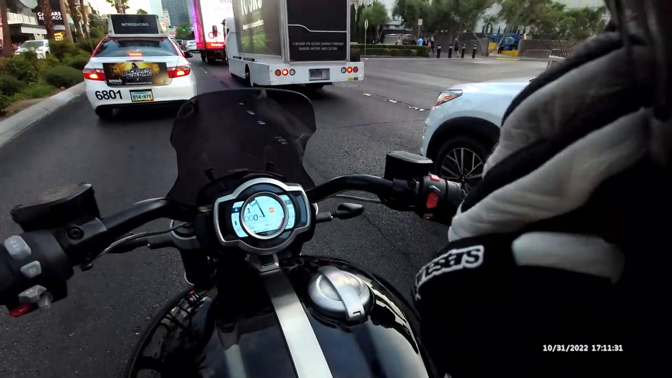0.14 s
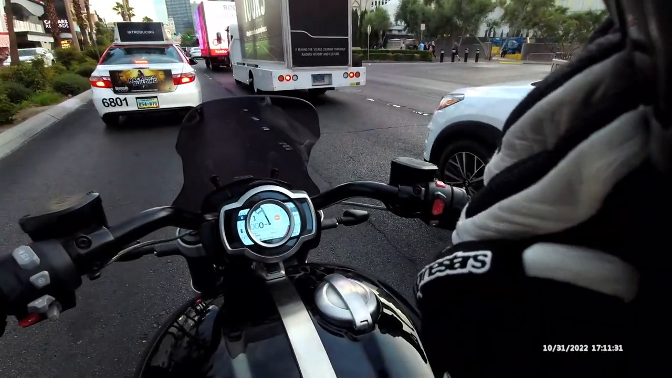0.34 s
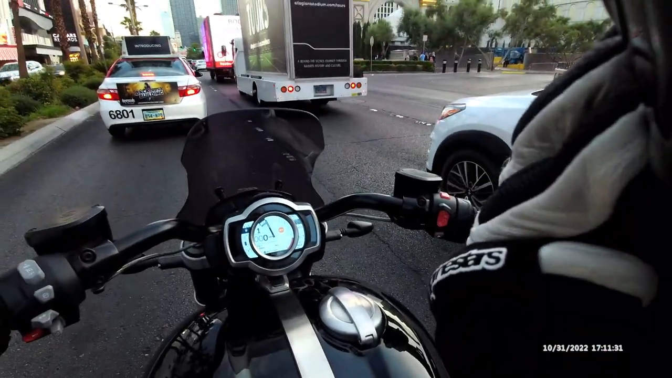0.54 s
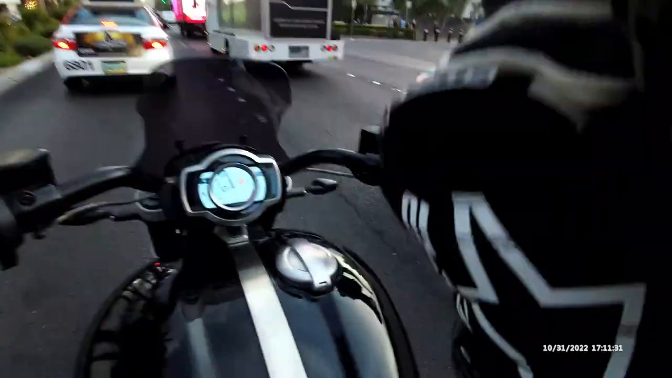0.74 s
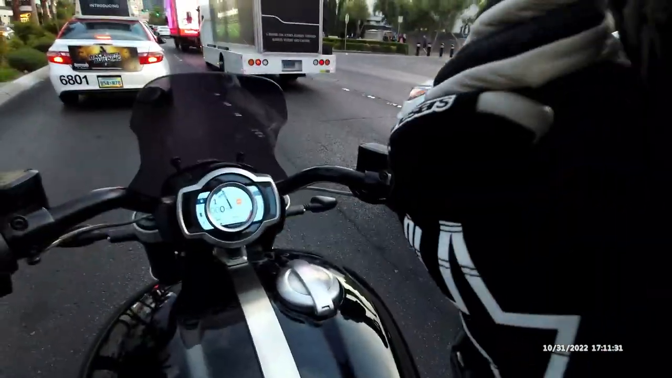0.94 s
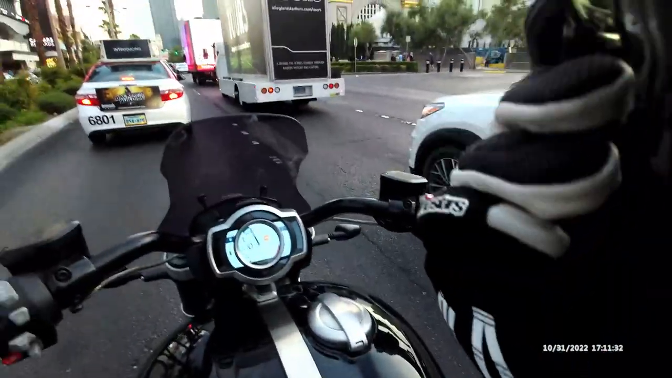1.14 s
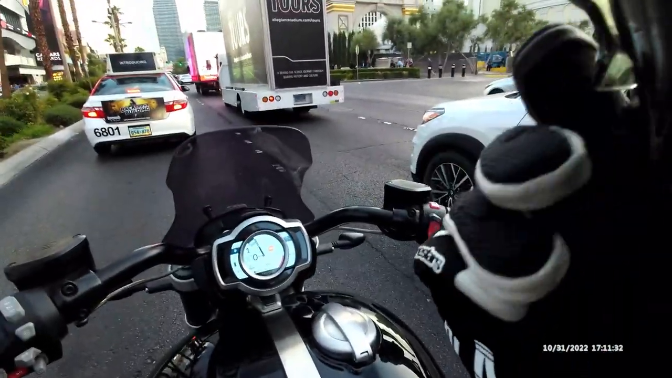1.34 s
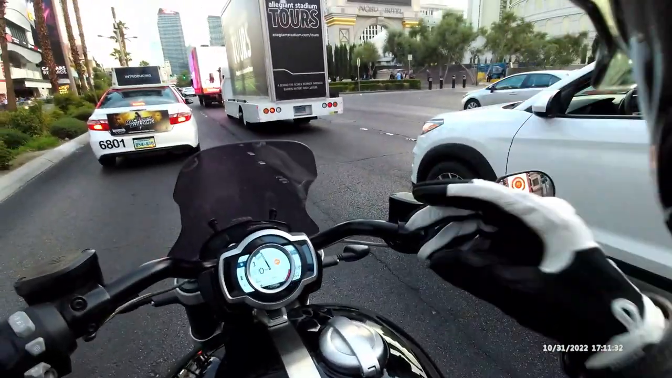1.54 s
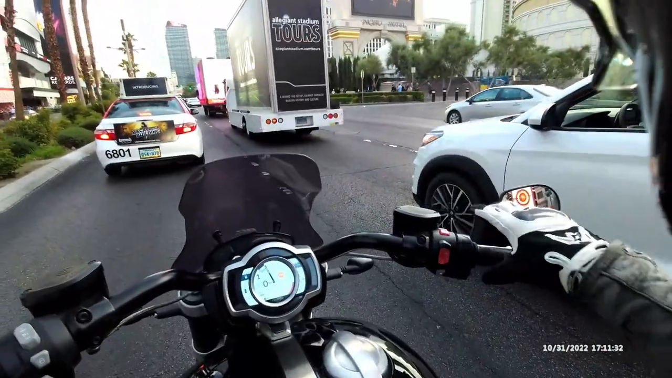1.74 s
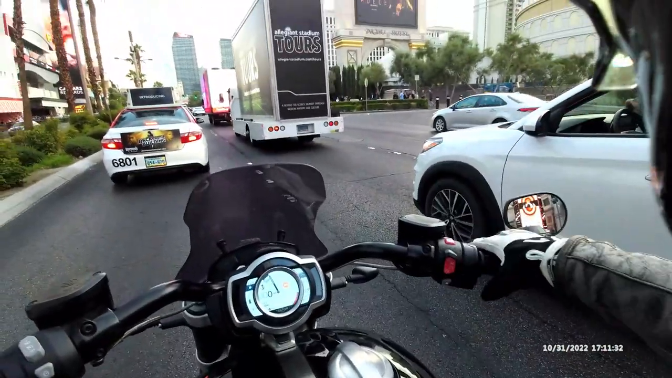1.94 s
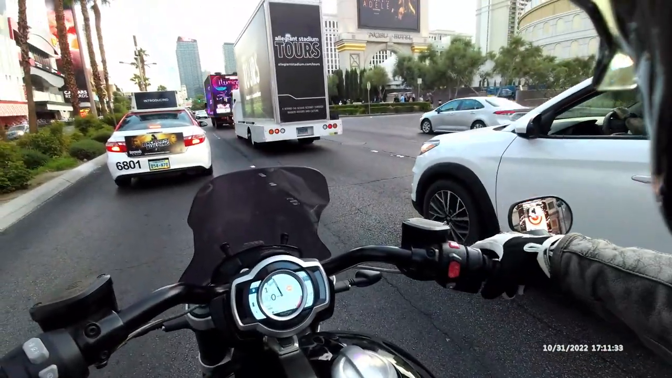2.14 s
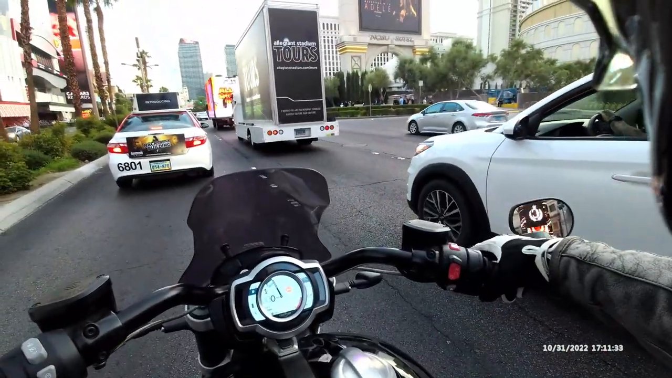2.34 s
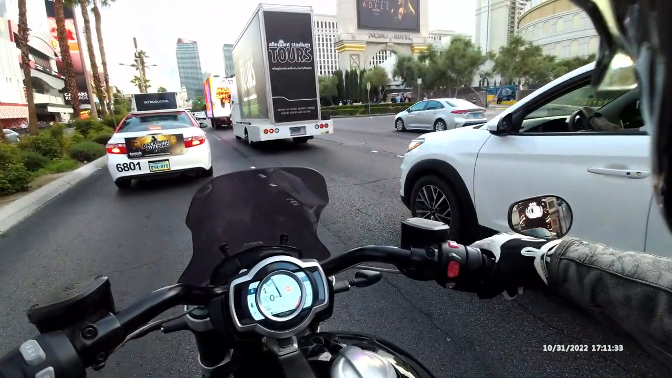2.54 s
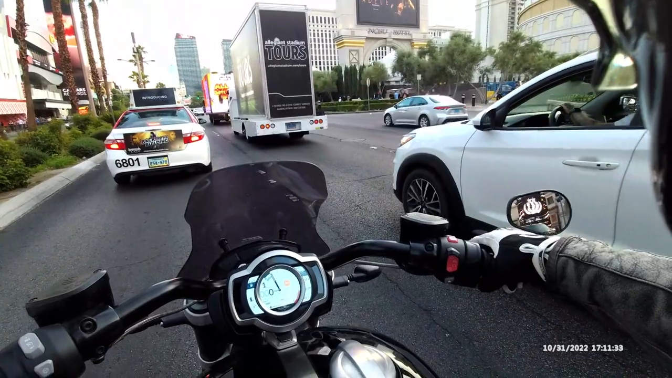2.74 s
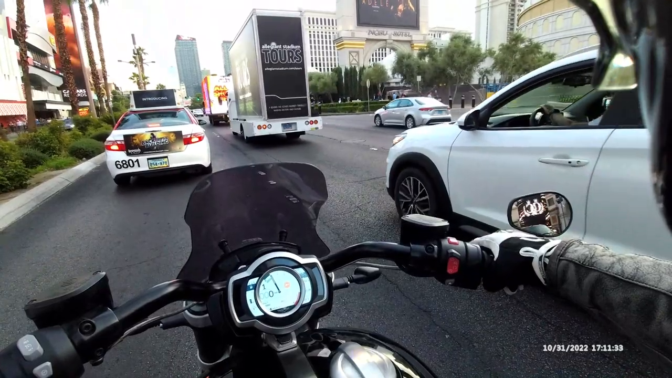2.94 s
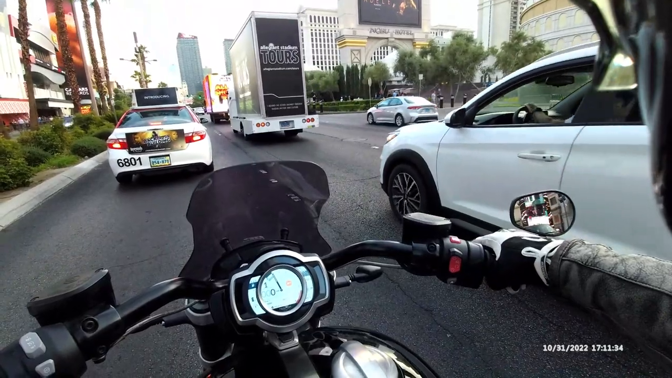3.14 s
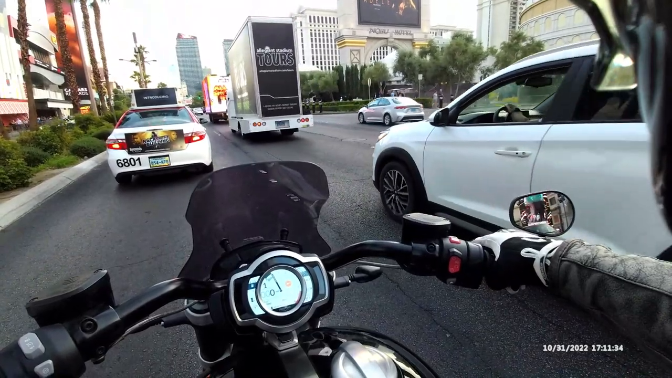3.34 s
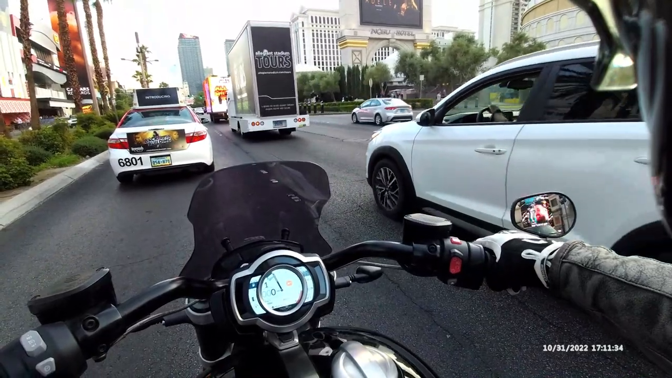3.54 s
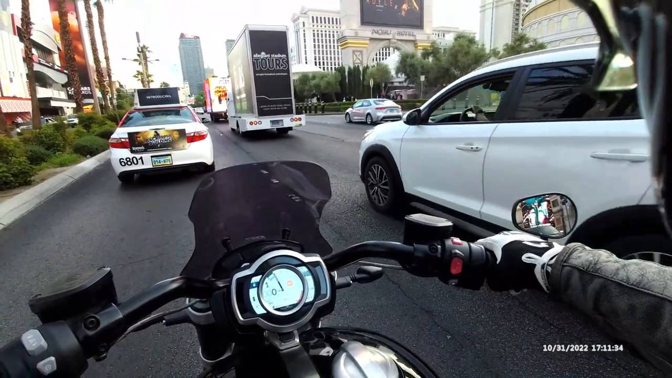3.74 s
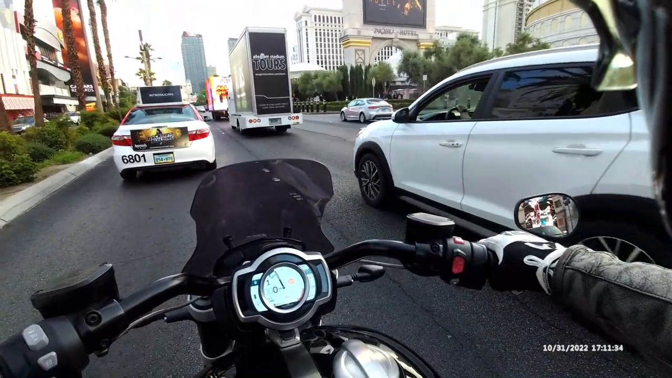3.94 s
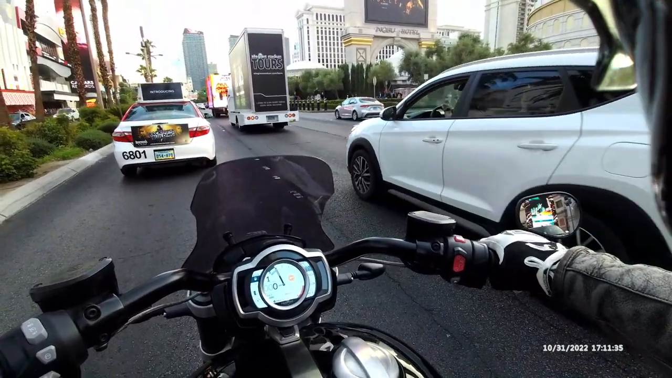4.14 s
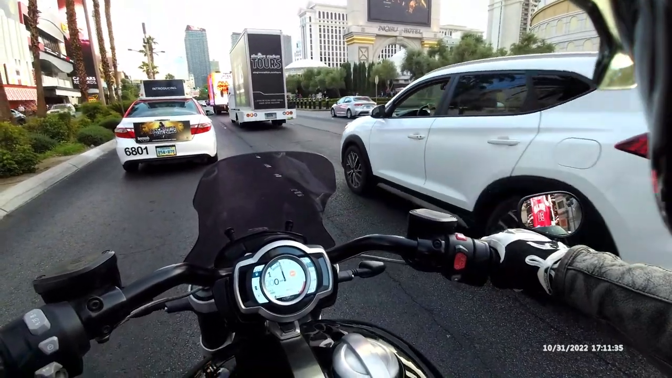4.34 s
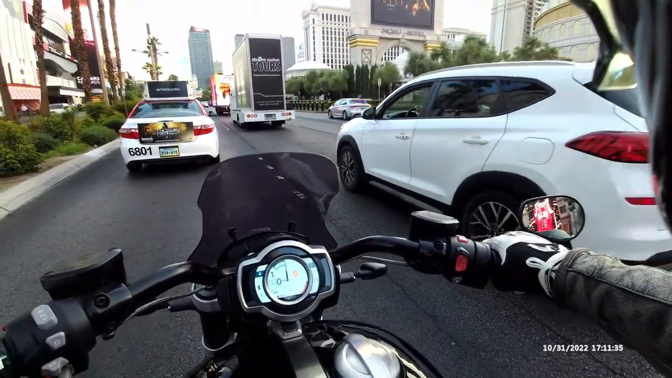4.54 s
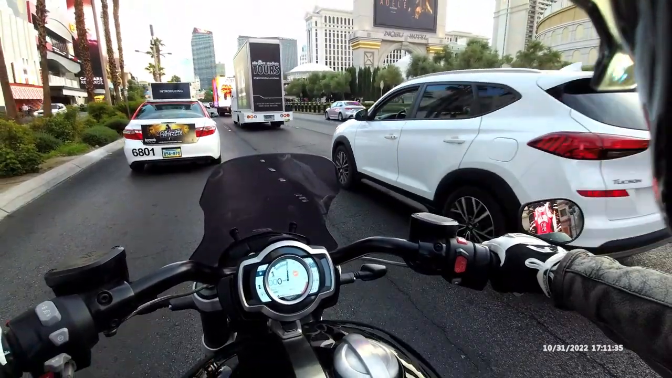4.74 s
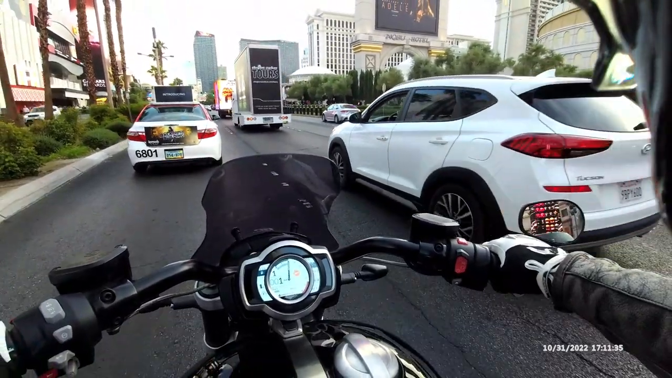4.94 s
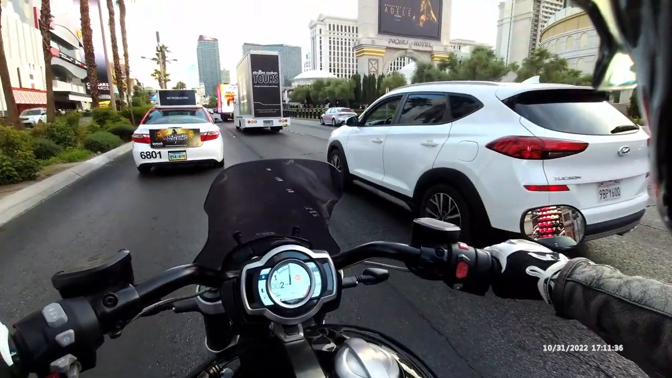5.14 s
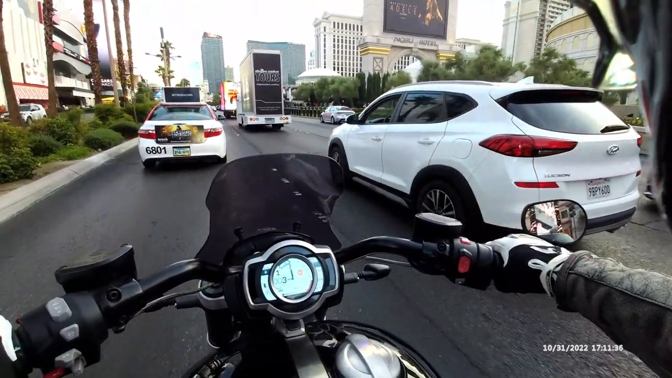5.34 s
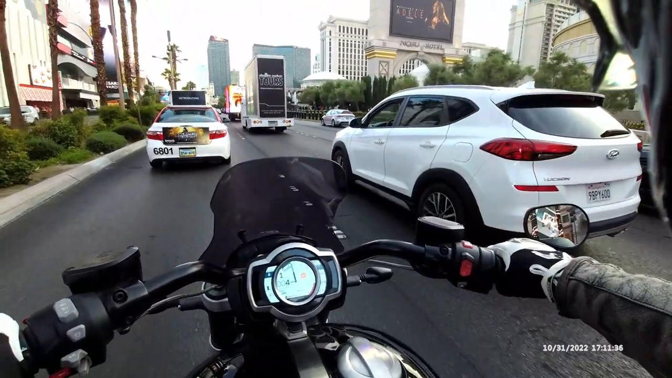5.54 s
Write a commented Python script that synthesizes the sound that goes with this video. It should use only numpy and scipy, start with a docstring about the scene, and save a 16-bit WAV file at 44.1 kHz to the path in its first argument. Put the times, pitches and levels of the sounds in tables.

```python
"""Motorcycle idling and revving once

A three-cylinder motorcycle idles in slow traffic, heard from the helmet, and is revved once near the end.
Each firing rings the exhaust pipe; under throttle the beat locks into clean multiples of the firing rate.
At first a gloved hand works at the helmet: plastic ticks ring the shell, cloth swishes, one heavy knock
opens the visor and its hinge ratchets. Filtered noise makes the street wash underneath. Narrow resonated
noise makes thin squeaks, probably brakes, and a wavering low hum is a car creeping past."""
import sys
import numpy as np
from scipy import signal
from scipy.fft import rfft, irfft, next_fast_len
from scipy.io import wavfile
from scipy.ndimage import uniform_filter1d

SR = 44100
rng = np.random.default_rng(int(sys.argv[2]) if len(sys.argv) > 2 else 0)


def voltage_ratio(decibels):
    """Convert decibels (scalar or array-like) to amplitude ratios, 20 dB per decade."""
    exponent = np.asarray(decibels, float) / 20
    return 10 ** exponent


def pcm_store(signal):
    """Save signal as 16-bit PCM."""
    levels = np.round(np.clip(np.atleast_2d(signal), -1, 1) * 32767)
    wavfile.write(sys.argv[1], SR, levels.astype(np.int16).T)


N = 251370  # length in samples


def read(points, hz):
    """Reads a table of (Hz, value) at the given frequencies, along a log scale."""
    f, value = np.transpose(points)
    return np.interp(np.log(hz + 1), np.log(f + 1), value)


def curves(rows):
    """Draws every column of a table that starts with seconds, sample by sample."""
    s, *columns = np.transpose(rows)
    return [np.interp(np.arange(N) / SR, s, c) for c in columns]


def evened(x):
    """Scales to rms 1."""
    return x / np.sqrt(np.mean(abs(x) ** 2) + 1e-20)


def add(mix, s, sound):
    """Mixes a sound in at time s."""
    part = mix[round(s * SR):][:len(sound)]
    part += sound[:len(part)]


def band(x, lo_hz, hi_hz):
    """Keeps only the range between two frequencies."""
    return signal.sosfilt(signal.butter(2, [lo_hz, hi_hz], "band", fs=SR, output="sos"), x)


def resonate(x, hz, width):
    """Shifts hz down to zero, smooths twice, shifts back: a soft-starting resonance of gain 1."""
    turn = np.exp(2j * np.pi * np.cumsum(hz * np.ones(len(x))) / SR)
    r = np.exp(-np.pi * width / SR)
    smooth = signal.lfilter([(1 - r) ** 2], [1, -2 * r, r * r], x / turn)
    return 2 * (turn * smooth).real


def ring(modes, size, lowest=0.848, highest=1.056):
    """Dying sines of a struck body, each retuned by a random factor for where it is hit."""
    t = np.arange(size) / SR
    out = np.zeros(size)
    for hz, db, t60 in modes:
        tuned_hz = hz * rng.uniform(lowest, highest)
        out += voltage_ratio(db - 60 * t / t60) * np.sin(2 * np.pi * tuned_hz * t)
    return out


def rfft_hz(size):
    """Bin frequencies of a spectrum."""
    return np.fft.rfftfreq(size, 1 / SR)


def stroke(from_s, to_s, attack_s, release_s):
    """Envelope 0-1: rises, holds, dies away."""
    t = np.arange(N) / SR
    return np.clip((t - from_s) / attack_s, 0, 1) * np.exp(-np.maximum(t - to_s, 0) / release_s)


def waver(size):
    """Slow complex chance of rms 1, smoothed twice over size samples."""
    once = uniform_filter1d(rng.standard_normal((2, N)), size=size)
    a, b = uniform_filter1d(once, size=size)
    return evened(a + 1j * b)


# Engine speed, hunting a little at idle and then revved once.
# Each row: time in seconds, firings per second.
ENGINE_SPEED = [(0, 25.45), (1.1, 24.95), (1.65, 24.1), (1.9, 25.6), (2.3, 25.05), (4.0, 25.1),
                (4.094, 26.5), (4.236, 36.4), (4.374, 44.1), (4.534, 49.8), (4.672, 53.5), (4.76, 52.9),
                (4.894, 50.8), (5.088, 44.5), (5.406, 34.1), (5.7, 30.2)]


def speed():
    """Firings per second."""
    return curves(ENGINE_SPEED)[0]


def firings():
    """Running count of firings."""
    return np.cumsum(speed()) / SR + 0.3993


IDLE_HZ, TOP_HZ = 25, 53.5  # firings per second


def revs():
    """0 at idle, 1 at the top of the rev."""
    return np.clip((speed() - IDLE_HZ) / (TOP_HZ - IDLE_HZ), 0, 1)


LOCK_FROM_HZ, LOCK_OVER_HZ = 25.8, 7.1  # firings per second: where locking starts, the range it takes


def locked():
    """Share of the beat that has locked into clean orders; once locked it stays locked."""
    return np.maximum.accumulate(np.clip((speed() - LOCK_FROM_HZ) / LOCK_OVER_HZ, 0, 1))


KNOCK_S, OPENING_S = .7314, 0.02  # when the knock comes, how long the visor takes to swing open


def shut():
    """1 while the visor is shut, 0 once the knock has opened it."""
    return 1 - stroke(KNOCK_S, N / SR, OPENING_S, 1)


PULSES_IDLE_DB, PULSES_REV_DB = -32, 7  # idle level with open visor, gain up to top speed
SHUT_PULSES_DB, PULSES_LOCKED_DB = 4, -11  # change while the visor is shut, change once locked
# Moments when the exhaust beat dips briefly.
# Each row: middle in seconds, length in seconds, change in dB at the middle.
BEAT_DIPS = [(0.544, 0.023, -16), (0.901, 0.043, -16), (1.54, 0.1, -2), (2.097, 0.062, -3),
             (2.346, 0.053, -14), (2.518, 0.031, -5.5), (2.762, 0.046, -2.5), (2.97, 0.038, -12),
             (3.484, 0.071, -8), (3.905, 0.061, -2.5)]


def pulses_db():
    """Level of the exhaust beat."""
    t = np.arange(N) / SR
    dips = sum(db * np.exp(-((t - s) / length * 2) ** 2) for s, length, db in BEAT_DIPS)
    visor_and_lock = SHUT_PULSES_DB * shut() + PULSES_LOCKED_DB * locked()
    return PULSES_IDLE_DB + PULSES_REV_DB * revs() + visor_and_lock + dips


UNEVEN_IDLE_DB, UNEVEN_LOCKED_DB = 1.6, 1.5  # scale of the spread in firing strength
JITTER_S = .0005  # average lateness of a firing before the beat locks
LOW_LAG_S = .0035  # the lowest mode speaks late
SHUT_LOW_DB, LOCKED_LOW_DB = -2, -14  # lowest mode: change until the knock opens the visor, once locked
SHUT_UPPER = 0.57  # a shut visor sharpens the beat this much, compared with locking
PIPE_ECHO_S = 0.0204  # the pulse returns from the open end after this time
# Strength of each cylinder before the beat locks. Each entry: level in dB.
CYLINDER_LEVELS = [-6.5, -2, -2]
# Modes of the exhaust pipe. Each row: frequency in Hz, width in Hz, level in dB.
PIPE_MODES = [(102.5, 37.6, 1.5), (192.7, 46.2, 7), (301.5, 79, -9.5), (470, 72, -29)]
# Inverted echo that damps each mode. Each entry: share of the pulse, for one mode.
ECHO_SHARE = [.12, .1, .25, .3]
# How much of the uneven strength each mode feels. Each entry: share, for one mode.
UNEVEN_SHARE = [.7, 1, 1, 1]
# Turbulence in each mode before the beat locks. Each entry: share, for one mode.
TURBULENCE_SHARE = [.8, .26, .3, .3]


def exhaust():
    """One pulse a firing, uneven in strength, rings the pipe; turbulent puffs roughen it."""
    lock = locked()
    brightness = SHUT_UPPER * shut() + lock  # lifts the upper pipe modes
    uneven_db = UNEVEN_IDLE_DB + (UNEVEN_LOCKED_DB - UNEVEN_IDLE_DB) * lock
    turns = firings()
    at = np.flatnonzero(np.diff(np.floor(turns)))
    late = JITTER_S * SR * (1 - lock[at]) * rng.uniform(0, 2, 300)[:len(at)]
    at += np.round(late).astype(int)
    chance = rng.uniform(-1.7, 1.7, (300, 1 + len(PIPE_MODES)))[:len(at)]
    mean_db = np.mean(CYLINDER_LEVELS)
    cylinder_db = mean_db + (np.resize(CYLINDER_LEVELS, len(at)) - mean_db) * (1 - lock[at])
    puffs = np.exp(-(turns % 1) / .5) * rng.standard_normal(N)
    out = np.zeros(N)
    for k, (hz, width, db) in enumerate(PIPE_MODES):
        lowest = k == 0
        shut_db = lowest * SHUT_LOW_DB * (at < KNOCK_S * SR)
        chance_db = UNEVEN_SHARE[k] * uneven_db[at] * (chance[:, 0] + .5 * chance[:, 1 + k])
        strength = voltage_ratio(cylinder_db + shut_db + chance_db)
        pulses = np.zeros(N)
        pulses[at] = strength - lock[at] * strength.mean()  # once locked, only the unevenness is left here
        pulses -= ECHO_SHARE[k] * np.roll(pulses, round(PIPE_ECHO_S * SR))
        drive = np.roll(evened(pulses), lowest * round(LOW_LAG_S * SR))
        drive = drive + TURBULENCE_SHARE[k] * (1 - .8 * lock) * puffs
        mode_db = db + 2.0 * k * brightness + lowest * LOCKED_LOW_DB * lock
        sign = (-1) ** k  # neighbouring modes have opposite signs
        out += sign * voltage_ratio(mode_db) * resonate(drive, hz, width) / np.sqrt(width)
    out = band(out, 32, 475)  # the beat stays between 32 and 475 Hz
    slow = np.sqrt(uniform_filter1d(out ** 2, SR // 2) + 1e-20)  # its own level over half a second
    return voltage_ratio(pulses_db()) * out / slow


WASH_IDLE_DB, WASH_REV_DB = -47, 7  # middle range at idle with open visor, gain up to top speed
SHUT_WASH_DB = -4.5  # change while the visor is shut
# Overall colour of the wash. Each row: frequency in Hz, relative level in dB per Hz.
STREET_COLOUR = [(40, -23), (90, -8), (200, -6.5), (270, -12.5), (490, -17), (700, -23), (1370, -35.5),
                 (2000, -39), (3400, -44), (3900, -58), (5000, -53), (6200, -59), (12500, -59),
                 (14500, -61), (16000, -75)]
# Narrow humps and hollows in it, probably cavities round the microphone.
# Each row: frequency in Hz, width in Hz, change in dB.
CAVITY_HUMPS = [(483, 37, 3), (677, 64, -5), (744, 54, 2.5), (990, 110, 1.5), (1170, 37, -3),
                (1700, 85, 4.5), (1770, 73, -8), (1980, 49, 3), (2170, 180, -2), (2950, 200, 1),
                (4730, 200, 0), (5070, 100, -1.5), (11050, 330, 4.5)]
# Treble of the wash. Each row: time in seconds, level in dB relative to the middle range.
WASH_TREBLE = [(0, -20), (.6, -27.5), (1.3, -28), (1.9, -26), (4.1, -26.5), (4.4, -25), (5.7, -24.5)]


def wash():
    """Street and engine clatter: patchy broad noise that throbs slightly with the firings."""
    level_db = WASH_IDLE_DB + SHUT_WASH_DB * shut() + WASH_REV_DB * revs()
    treble_db = curves(WASH_TREBLE)[0]
    frames, hz = N // 256 + 6, rfft_hz(1024)
    a, b, patches = rng.standard_normal((frames, 513, 3)).T
    patches = uniform_filter1d(patches, size=8, axis=0)  # smooth over frequency, then over time
    patches = evened(uniform_filter1d(patches, size=8, axis=1))
    humps_db = sum(db * np.exp(-((hz - f) / width * 2) ** 2) for f, width, db in CAVITY_HUMPS)
    colour_db = read(STREET_COLOUR, hz) + humps_db
    z = (a + 1j * b) * voltage_ratio(colour_db[:, None] + 0.93 * patches)
    low = signal.istft(z * (hz < 4200)[:, None], nperseg=1024, noverlap=768)[1][:N]
    high = signal.istft(z * (hz >= 4200)[:, None], nperseg=1024, noverlap=768)[1][:N]
    low = low / np.std(band(low, 450, 3600))
    throb = 1 + .15 * np.cos(2 * np.pi * (firings() - .7))
    return voltage_ratio(level_db) * evened(throb) * (low + voltage_ratio(treble_db) * evened(high))


TICK_PAN_DB, TICK_RISE_S = 1.1, 0.0006  # random lean of a tick to left or right, its soft start
FAINT_TICKS, FAINT_FROM_S, FAINT_TO_S, FAINT_DB = 14, .33, 1.1, -49  # extra ticks at random, 4 dB up or down
RUB_ATTACK_S, RUB_RELEASE_S = 0.014, 0.12
SCUFF_DB = 3.5  # middle range of the drag, relative to its treble
# Glove hitting plastic.
# Each row: start in seconds, level in dB, body relative in dB, bright edge relative in dB.
GLOVE_TICKS = [(0.0074, -39, 3.5, -4), (0.0194, -39, -8, -14), (0.0618, -38, 2, 2), (0.117, -47, -8, -8),
               (0.311, -47, -5, -8), (0.461, -46, -10, 3), (0.694, -50, -10, -5), (0.2528, -42, 17, 1.5),
               (0.3431, -38.5, 5, -4), (0.3735, -41, 7.5, 1.5), (0.3915, -31, -2, -35),
               (0.4095, -38.5, -22, -30), (0.4738, -36, 15.5, -11.5), (0.4998, -44, 17, -1.5),
               (0.5117, -32, 3, -6.5), (0.5196, -39.5, -6, 9), (0.5259, -34, 0, 4.5), (0.5506, -41, -15, 2),
               (0.5646, -29, -15, -9.5), (0.5955, -32.5, -11, -16.5), (0.6155, -43, -8, 5),
               (0.6424, -43, 8.5, -1), (0.6586, -26, 9, -25), (0.6779, -33, 12.5, -11.5),
               (0.7078, -40, 9, -15), (0.7262, -42, 3, -10), (0.7303, -27, 8, 0), (0.7335, -40, 17, -10),
               (0.7454, -49, 21, -11), (0.808, -40, -13, -4.5), (0.9053, -33, -19, -24.5),
               (0.9187, -38, -8, -22.5), (0.9433, -35, -2, -7.5), (0.9882, -38, 2, -7.5),
               (1.0136, -28, -1, -30), (1.0377, -39.5, -9, -5.5), (1.0455, -33, 2, -12),
               (1.0505, -36, -5, -20), (1.132, -47, -5, -20), (1.2775, -42.5, -2, -15),
               (1.2989, -35, 1, -1.5), (1.6482, -32.5, -7, -3)]
# Helmet shell, before each hit retunes it.
# Each row: frequency in Hz, level in dB, seconds to fall by 60 dB.
SHELL_MODES = [(448, 6.5, 0.018), (847, -6, 0.025), (1180, -7, 0.0059), (2020, -1, 0.018),
               (2484, -2, 0.015), (2910, -8.5, 0.02), (4160, -5, 0.0064)]
# Glove dragging over the shell. Each row: start in seconds, end of hold in seconds, level in dB.
GLOVE_RUBS = [(0, 1.3, -88), (.34, .62, -85), (0.419, 0.39, -66), (0.729, 0.72, -61), (1.0, 1.15, -76)]


def glove():
    """Ticks ring the shell and carry a short crunch and a bright crack; the glove also drags in grains."""
    out, t = np.zeros((2, N)), np.arange(1500) / SR
    lowest = [FAINT_FROM_S, FAINT_DB - 4, -5, -15]
    highest = [FAINT_TO_S, FAINT_DB + 4, 8, -3]
    faint = rng.uniform(lowest, highest, (FAINT_TICKS, 4))
    for s, db, body_db, edge_db in [*GLOVE_TICKS, *faint]:
        puff = rng.standard_normal(len(t))
        thud = 1.58 * band(puff, 400, 1200) * voltage_ratio(-60 * t / 0.029)
        body = voltage_ratio(body_db) * (ring(SHELL_MODES[:3], size=1500) / 2 + thud)
        upper_ring = ring(SHELL_MODES[3:], size=1500) / 2
        crunch = band(puff, 1200, 3730) * voltage_ratio(-60 * t / 0.011)
        crack = band(puff, 5000, 15500) * voltage_ratio(edge_db - 60 * t / .01)
        tick = voltage_ratio(db) * np.minimum(t / TICK_RISE_S, 1) * (body + upper_ring + crunch + crack)
        pan_db = TICK_PAN_DB * rng.standard_normal()
        add(out[0], s, voltage_ratio(pan_db) * tick)
        add(out[1], s, voltage_ratio(-pan_db) * tick)
    grain_size = voltage_ratio(1.9 * np.minimum(rng.exponential(1, N), 4))
    grains = grain_size * (rng.random(N) < 3000 / SR) * rng.standard_normal(N)  # about 3000 a second
    dragging = sum(voltage_ratio(db) * stroke(a, b, RUB_ATTACK_S, RUB_RELEASE_S) for a, b, db in GLOVE_RUBS)
    scuff = voltage_ratio(SCUFF_DB) * evened(band(grains, 1530, 2300))
    return out + dragging * (evened(band(grains, 3500, 12000)) + scuff)


SWISH_FROM_S, SWISH_TO_S, SWISH_DB = 0.701, 1.13, -48.5
SWISH_ATTACK_S, SWISH_RELEASE_S = 0.0093, 0.061


def sleeve():
    """A soft, lumpy swish of cloth: noise of slowly changing strength in the middle range."""
    lumps = voltage_ratio(3.3 * evened(uniform_filter1d(rng.standard_normal(N), size=300)))
    brushing = stroke(SWISH_FROM_S, SWISH_TO_S, SWISH_ATTACK_S, SWISH_RELEASE_S)
    return voltage_ratio(SWISH_DB) * brushing * evened(band(lumps * rng.standard_normal(N), 310, 1300))


KNOCK_DB, KNOCK_RISE_S = 9.5, .007  # gain on the modes below, their soft start
GIVE_S, GIVE_DB = .0055, -15  # a short pull the other way just before the blow
RATTLE_DB, RATTLE_T60_S = -27.5, 0.043  # loose parts: level at the blow, seconds to fall by 60 dB
# The whole helmet, before the blow retunes it.
# Each row: frequency in Hz, relative level in dB, seconds to fall by 60 dB.
HELMET_MODES = [(177.3, 6.5, 0.02), (237, -16.5, 0.046), (416, -14, 0.039), (104, -20, 0.025)]


def knock():
    """One heavy blow that shakes the whole helmet and rattles its loose parts."""
    out = np.zeros(N)
    t = np.arange(6000) / SR
    shaken = ring(HELMET_MODES, size=6000, lowest=.94, highest=.98)
    blow = voltage_ratio(KNOCK_DB) * shaken * (1 - np.exp(-t / KNOCK_RISE_S))
    bumps = (rng.random(len(t)) < 900 / SR) * rng.standard_normal(len(t))  # about 900 a second
    rattle = voltage_ratio(RATTLE_DB - 60 * t / RATTLE_T60_S) * evened(band(bumps, 440, 2200))
    add(out, KNOCK_S - GIVE_S, -voltage_ratio(GIVE_DB) * np.hanning(round(GIVE_S * SR)))
    add(out, KNOCK_S, blow + rattle)
    return out


# Visor hinge turning, from the first row to the last.
# Each row: time in seconds, level in dB, teeth per second.
HINGE = [(1.0535, -46.5, 170), (1.1, -47.5, 172), (1.118, -48.5, 185), (1.127, -54, 185)]


def ratchet():
    """Each tooth of the hinge snaps and scrapes a short puff through one broad resonance."""
    level_db, rate = curves(HINGE)
    t = np.arange(N) / SR
    turning = (t > HINGE[0][0]) * (t < HINGE[-1][0])
    turns = np.cumsum(rate * turning) / SR
    snaps = np.diff(np.floor(turns), prepend=0) * voltage_ratio(.7 * rng.standard_normal(N))
    scrape = np.exp(-(turns % 1) / .3) * turning * rng.standard_normal(N)
    snapping = band(resonate(snaps + .07 * scrape, 2200, 1050), 900, 3600)
    teeth = snapping + .08 * band(scrape, 500, 1800)
    return voltage_ratio(level_db) * teeth / np.std(teeth[turning])


def squeak(from_s, to_s, from_hz, to_hz, db):
    """A thin, fuzzy whistle, probably of brakes: noise through a narrow resonance, held or gliding."""
    size = round((to_s - from_s) * SR)
    tone = resonate(rng.standard_normal(size), np.linspace(from_hz, to_hz, size), 90)
    return from_s, voltage_ratio(db) * evened(tone) * signal.windows.tukey(size, .3)


CAR_SECOND_DB = -7.5  # the octave, relative to the hum
# Hum of a car creeping past alongside. Each row: time in seconds, frequency in Hz, level in dB.
CAR_HUM = [(2.2, 122, -69), (2.45, 121.3, -39), (2.9, 118.1, -39.5), (3.2, 113.8, -45), (3.6, 112, -41.5),
           (4.0, 111.8, -39), (4.3, 110, -62)]


def car():
    """A wavering low hum with its octave."""
    hz, level_db = curves(CAR_HUM)
    turn = np.exp(2j * np.pi * np.cumsum(hz) / SR)
    wobble = 1 + .25 * waver(size=2500)
    hum = wobble * (turn + voltage_ratio(CAR_SECOND_DB) * turn ** 2)
    return np.sqrt(2) * voltage_ratio(level_db) * hum.real


ORDERS_REV_DB = 3.5  # gain of the low orders up to top speed
UPPER_DB, UPPER_REV_DB = -32.5, 13.5  # orders 7 to 16: level at top speed, gain up to it
UPPER_WAVER = .25  # how much the upper orders wander
SETTLE_S, SETTLE_RISE_S, SETTLE_DB = 5.4, 0.15, 7  # as the revs settle the upper orders swell
PULSE_LAG = .35  # the pulse leaves the pipe this many firings late
STRONG_CYLINDER, FULL_PULL = .25, 50  # extra strength at full pull; full pull in firings/s per second
# Own strength of orders 1 to 6. Each entry: level in dB at top speed, before the pipe.
LOW_ORDER_LEVELS = [6, 1.5, -0.5, -0.5, -2, -5.5]
# How much each low order wanders. Each entry: share of its strength.
LOW_ORDER_WAVER = [.03, .03, .07, .05, .14, .14]
# How the pipe passes orders 1 to 6, with a notch between its modes. Each row: frequency in Hz, gain in dB.
LOW_ORDER_PIPE = [(40, -53), (53, -41), (65, -33.5), (85, -28), (102, -25), (120, -29.5), (137, -36),
                  (160, -26.5), (200, -24), (225, -25), (248, -38), (270, -26), (295, -25.5), (320, -28)]
# Orders 7 to 16 by where they fall. Each row: frequency in Hz, gain in dB.
UPPER_ORDER_PIPE = [(200, -1), (240, -1), (265, 6), (295, 1.5), (340, -12), (420, -15), (470, -17.5),
                    (530, -10.5), (620, -16.5), (700, -20), (850, -39.5)]
# Phase that the pipe gives each order, turning over at the notch. Each row: frequency in Hz, phase in turns.
ORDER_PHASE = [(45, 1.15), (65, .34), (85, .1), (105, -.15), (125, -.23), (140, -.09), (160, -.04),
               (190, -.05), (215, -.1), (240, -.11), (255, -.59), (280, -.73), (320, -.78), (400, -1.4),
               (480, -2.2)]


def orders():
    """Under throttle the firings lock into multiples of their rate: low ones steadier, upper ones wavering."""
    turns, rate = firings() - PULSE_LAG, speed()
    below_top = revs() - 1
    settle_db = SETTLE_DB * stroke(SETTLE_S, N / SR, SETTLE_RISE_S, 1)
    lines = np.zeros(N)
    for k in range(1, 17):
        if k <= len(LOW_ORDER_LEVELS):
            db = LOW_ORDER_LEVELS[k - 1] + ORDERS_REV_DB * below_top + read(LOW_ORDER_PIPE, k * rate)
            wander = LOW_ORDER_WAVER[k - 1]
        else:
            db = UPPER_DB + UPPER_REV_DB * below_top + settle_db + read(UPPER_ORDER_PIPE, k * rate)
            wander = UPPER_WAVER
        tone = np.exp(2j * np.pi * (k * turns + read(ORDER_PHASE, k * rate)))
        lines += voltage_ratio(db) * ((1 + wander * waver(size=1100)) * tone).real
    # while the revs climb, one cylinder in three hits harder
    pull = uniform_filter1d(np.clip(np.gradient(rate) * SR / FULL_PULL, 0, 1), size=4000)
    stronger = 1 + STRONG_CYLINDER * pull * np.cos(2 * np.pi * turns / 3)
    return np.sqrt(2) * locked() * stronger * lines


GROWL_DB, GROWL_REV_DB = -57, 5.5  # level at top speed, gain up to it
GROWL_LAG, GROWL_UNEVEN_DB = .37, 2.5  # how many firings late it speaks, spread of burst strength


def growl():
    """Under throttle each firing throws a short burst of turbulence, a rough midrange, through the pipe."""
    turns = firings() - GROWL_LAG + 1
    strength = voltage_ratio(GROWL_UNEVEN_DB * rng.standard_normal(300))[turns.astype(int)]
    bursts = strength * np.exp(-(turns % 1) / 0.22) * rng.standard_normal(N)
    level_db = GROWL_DB + GROWL_REV_DB * (revs() - 1)
    return voltage_ratio(level_db) * locked() * evened(band(bursts, 380, 560))


# Thin squeaks, probably brakes.
# Each row: start in seconds, end in seconds, first Hz, last Hz, level in dB before the fades.
BRAKE_SQUEAKS = [(1.804, 3.05, 10950, 11130, -82), (1.95, 2.12, 12200, 12200, -80),
                 (2.312, 2.4, 12200, 12000, -77), (2.58, 2.7, 12200, 12200, -80),
                 (3.301, 3.417, 10860, 11300, -75), (3.427, 3.471, 11010, 13230, -80),
                 (3.48, 3.64, 13100, 11150, -80), (3.616, 3.7, 11150, 11300, -78),
                 (3.779, 3.846, 12400, 12300, -76), (3.35, 3.75, 8600, 8550, -89),
                 (3.804, 3.86, 8600, 8500, -82), (3.883, 3.93, 12700, 11800, -77),
                 (5.33, 5.427, 12100, 11950, -74), (5.424, 5.515, 8600, 8600, -76),
                 (5.463, 5.54, 12300, 11900, -74), (5.553, 5.6, 11150, 11050, -81),
                 (5.603, 5.658, 11450, 12200, -72), (5.675, 5.697, 13150, 12100, -77)]


def scene():
    """Engine, street and knock come from straight ahead; the hand works a little to the right."""
    ahead = exhaust() + orders() + growl() + car() + wash() + knock()
    for row in BRAKE_SQUEAKS:
        add(ahead, *squeak(*row))
    hand = glove() + sleeve() + ratchet()
    return ahead + voltage_ratio([[-.4], [.4]]) * hand


def roll_off(x):
    """The treble ends steeply here."""
    return signal.sosfilt(signal.butter(12, 16370, fs=SR, output="sos"), x)


# Difference between the two microphone ports.
# Each row: frequency in Hz, side level in dB relative to the middle.
PORT_SPREAD = [(60, 1), (110, -6.5), (200, -12), (380, -18.5), (700, -22), (1290, -32), (2380, -27),
               (4400, -25), (8120, -19), (15000, -30.5)]


def record(dry):
    """A bass cut, then two microphone ports whose phases part toward the bass."""
    margin = SR // 4
    longer = np.pad(dry, ((0, 0), (margin, margin)), "reflect")  # keeps the filters from clicking at the ends
    size = next_fast_len(N + 2 * margin)
    hz = rfft_hz(size)
    cut = 1 / (1 + (58 / (hz + 1)) ** 7)
    side = voltage_ratio(read(PORT_SPREAD, hz)) * np.exp(1j * 1.62)  # about a quarter turn out of phase
    spectrum = rfft(longer, size) * cut * [1 + side, 1 - side]
    ports = irfft(spectrum, size)[:, margin:margin + N]
    ports *= np.minimum(np.arange(N, 0, -1) / 200, 1)  # short fade at the very end
    return roll_off(ports)


dry = scene()
out = record(dry)
pcm_store(out)
```